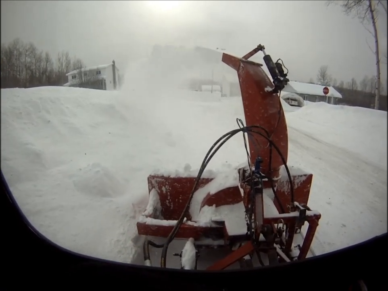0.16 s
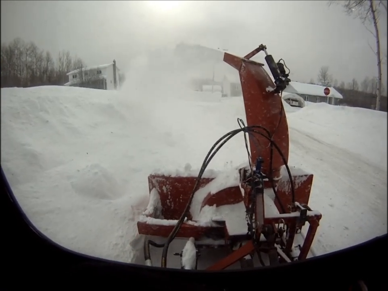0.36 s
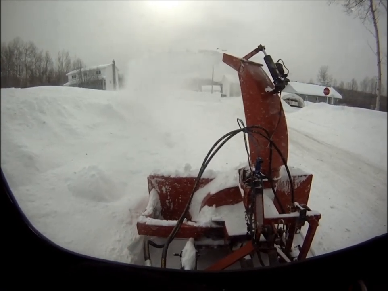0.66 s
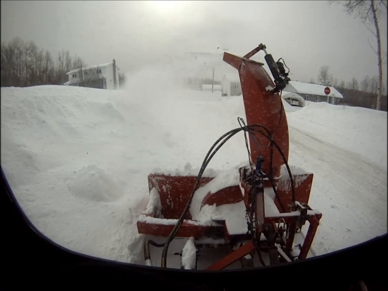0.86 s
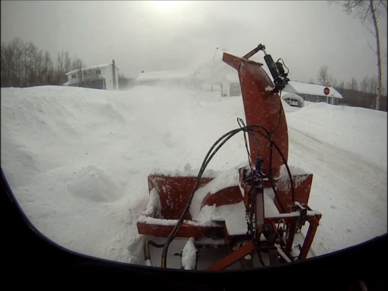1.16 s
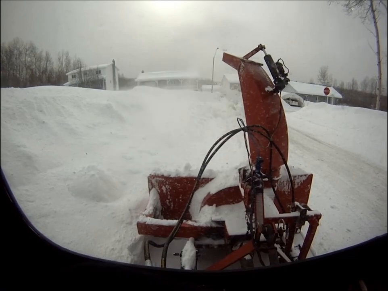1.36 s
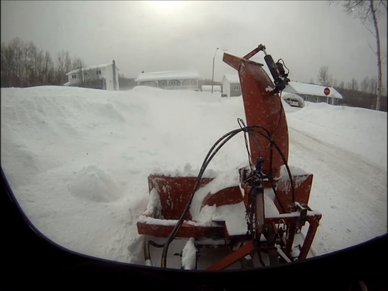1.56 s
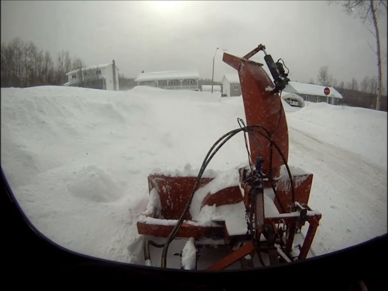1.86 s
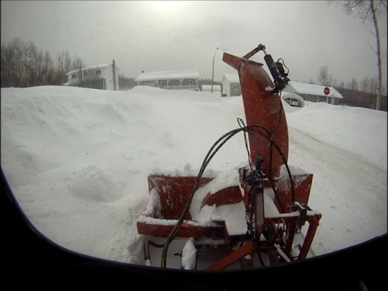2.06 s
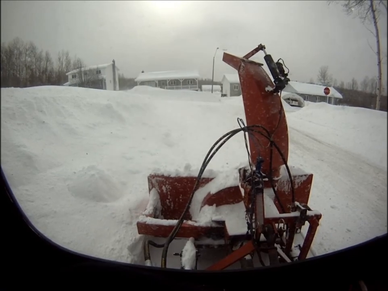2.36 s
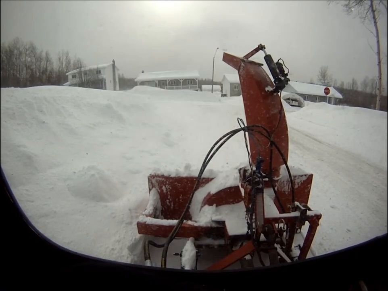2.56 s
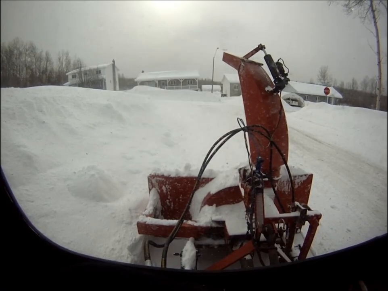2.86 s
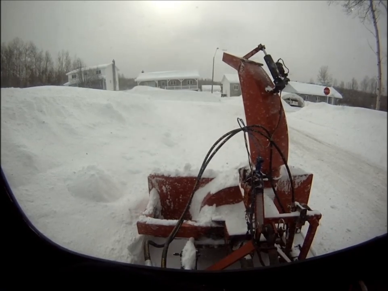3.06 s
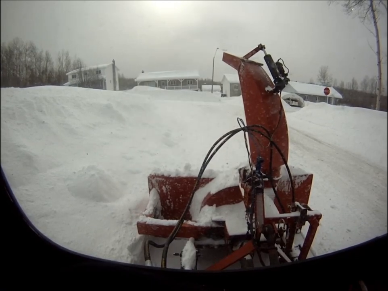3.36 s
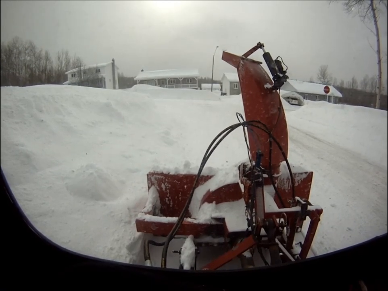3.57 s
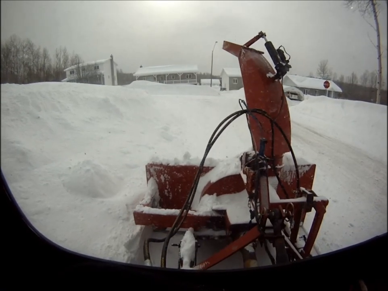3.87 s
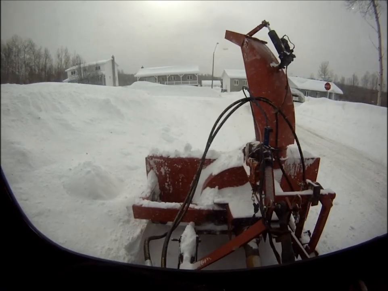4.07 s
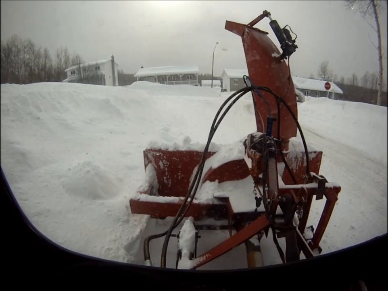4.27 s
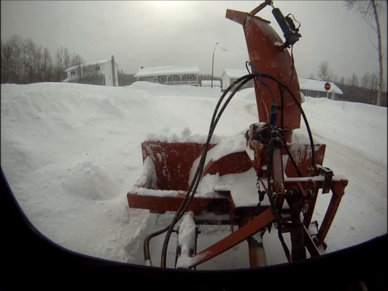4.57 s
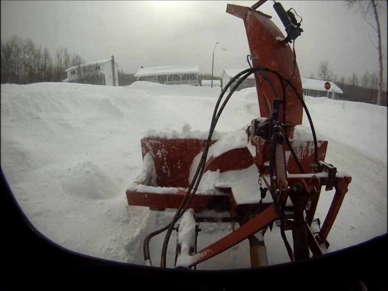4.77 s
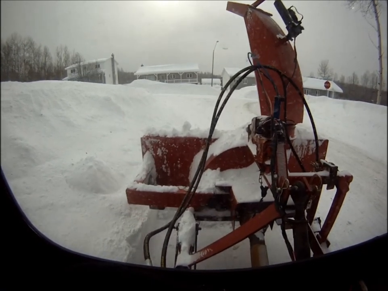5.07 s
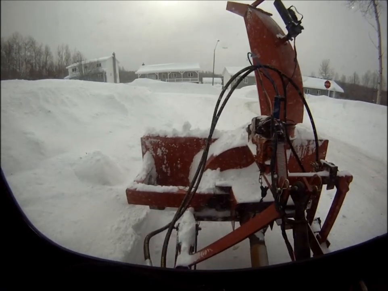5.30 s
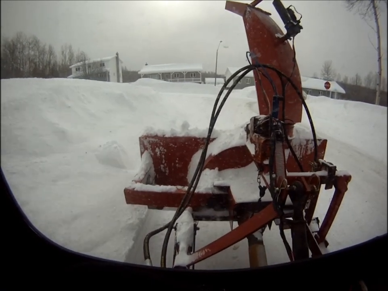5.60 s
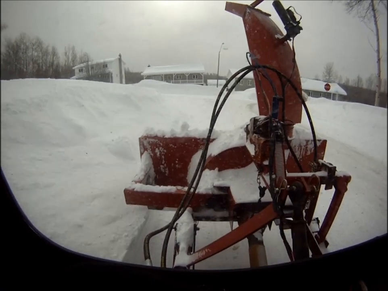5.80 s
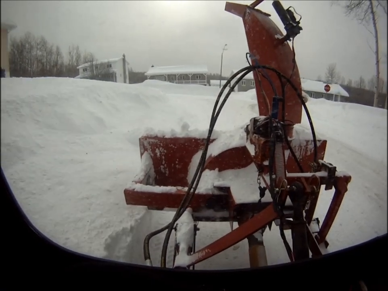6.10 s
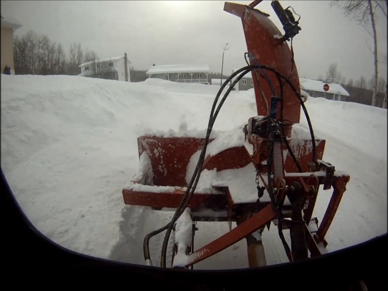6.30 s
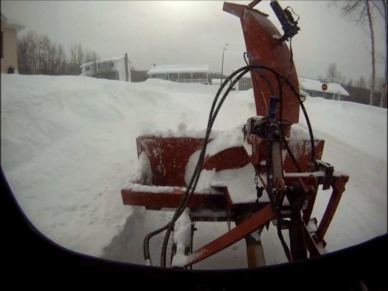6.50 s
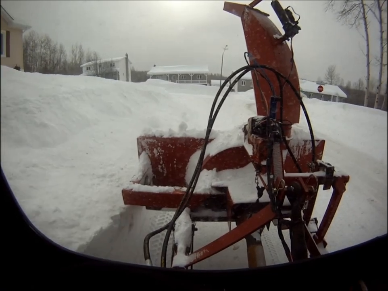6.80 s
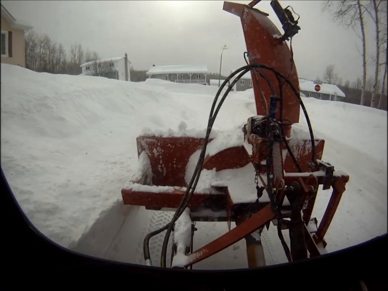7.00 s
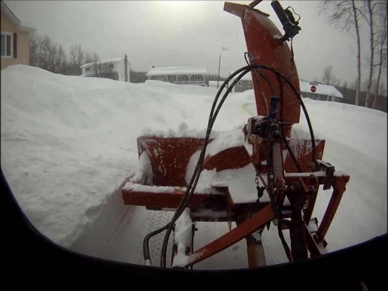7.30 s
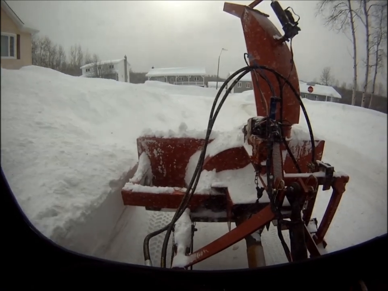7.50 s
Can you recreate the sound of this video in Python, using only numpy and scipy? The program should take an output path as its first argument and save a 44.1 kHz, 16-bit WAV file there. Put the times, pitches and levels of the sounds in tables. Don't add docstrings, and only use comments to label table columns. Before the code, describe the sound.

Inside a closed tractor cab, a small diesel drones and clatters, eases, sags as the snowblower lifts, then revs up with loud gear whine backing away.

```python
import sys
import numpy as np
from scipy import signal
from scipy.fft import rfft, irfft, next_fast_len
from scipy.io import wavfile

SR = 44100
rng = np.random.default_rng(int(sys.argv[2]) if len(sys.argv) > 2 else 0)


def generate_wav(signal):
    frames = np.transpose(np.atleast_2d(signal))
    scaled = np.clip(frames, -1, 1) * 32767
    pcm = np.round(scaled).astype(np.int16)
    wavfile.write(sys.argv[1], SR, pcm)


def rack_gain(trim_db):
    fader = np.asarray(trim_db, float)
    return 10 ** (fader / 20)


N = 337365
TIME_S = np.arange(N) / SR
END_S = N / SR
MEAN_HZ = 20.5
ENGAGE_S = 5.5

# (time [s], four-stroke cycle rate [Hz])
ENGINE_SPEED = [(0, 19.3), (.32, 19.4), (.62, 20.78), (.9, 20.87), (1.35, 20.57), (2.45, 20.92),
                (3.5, 20.86), (4.02, 19.38), (4.5, 19.88), (4.72, 19.66), (5.15, 18.22), (5.3, 18.4),
                (5.55, 19.2), (5.85, 20.6), (6.28, 21.62), (6.6, 21.56), (7.1, 21.89), (7.65, 21.9)]
# (time [s], share [0-1])
EFFORT = [(0, 0.92), (.28, 0.8), (.45, 0.66), (.8, 0.17), (2.5, 0.18), (3.8, 0.12), (4.17, .45),
          (4.8, 0.43), (5.13, 0.65), (5.41, 0.92), (5.9, 0.92), (6.7, 0.87), (7.65, 0.97)]
# (start [s], end [s], attack [s], release [s])
LABOUR = (4.86, 5.72, .25, 0.075)
LABOUR_DB = [-2, -2, 7, -3]
# (frequency [Hz], level [dB])
FIRING = [(55, -17), (59, -17), (62, -16), (66, -16.4)]
CRANK = [(37, -23), (41.7, -26), (42.3, -25.5), (44, -31)]
THIRD = [(165, -26.5), (175, -26.5), (178.5, -28), (187, -27.5), (197, -30.5)]
FOURTH = [(220, -26.5), (236, -32.5), (249, -32.5), (263, -27)]
# (multiple of the cycle rate [-], level [dB])
MINOR_ORDERS = [(4, -34), (5, -52), (6, -47), (7, -47), (8, -39), (10, -27.5), (11, -44), (13, -43),
                (14, -42), (15, -41), (16, -44), (17, -46), (18, -46), (19, -50), (20, -51), (21, -46),
                (24, -53), (32, -49), (33, -41), (34, -45), (37, -52)]
# (frequency [Hz], level [dB])
CAB_BOOM = [(76, -6), (84, .1), (98, 14), (104, .1), (113, 8), (124, .1), (152, -6), (160, 6), (167, 8),
            (174, -1), (186, -10), (196, .1), (310, .1), (330, 3), (400, .1), (436, 3), (458, 10),
            (500, -2), (760, .1)]
# (place in the cycle [0-1], knock level [dB])
CYLINDERS = [
    (.1, -30),
    (.45, -5),
    (.78, -10),
]
# (frequency [Hz], level [dB per Hz])
RUMBLE = [(25, -26), (45, -28), (70, -4), (110, -18.5), (150, -11), (200, -5.5), (260, -9), (350, -15),
          (520, -19.5), (600, -13), (690, -15), (800, -19), (900, -25), (1200, -44), (1600, -79)]
# (frequency [Hz], level [dB per Hz])
CLATTER = [(530, -17), (900, -10), (924, -9), (1060, -3), (1180, -10), (1280, -2.5), (1990, -2.5),
           (2160, -1.5), (2340, -1.5), (2530, 1.5), (2820, -2), (3610, -0.5), (4580, -9.5), (5970, -18.5),
           (7450, -37), (9680, -61), (16400, -120)]
# (frequency [Hz], level [dB], t60 [s])
TAP_MODES = [(1425, -40.5, 0.057), (714, -36.5, 0.051), (1250, -44.5, 0.048), (2138, -40, 0.029),
             (2953, -42.5, 0.043), (3650, -44, 0.022)]
# (multiple of the cycle rate [-], level [dB], fully loaded from [s])
DRIVE = [(32.06, -24.5, 5.76), (39.6, -30.5, 4.9), (51.9, -50, 6.2), (59.8, -43, 4.8), (64.3, -31, 6.25),
         (69.05, -33.5, 5.7), (85.95, -41.5, 5.88), (119.9, -48, 5.6)]
# (multiple of the cycle rate [-], level [dB])
LIFT_PUMP = [(41.65, -49), (125.2, -58), (50.6, -58)]
# (start [s], end [s], attack [s], release [s])
LIFT_ON = (.4, 3.76, .08, 0.11)
# (time [s], level [dB])
LIFT_SURGES = [
    (.44, -1),
    (3.55, 9),
]
# (time [s], peak level [dB], decay [s])
LUMP = [
    (1.88, -35, 0.016),
    (1.904, -19, .006),
    (1.909, -17, 0.004),
    (1.9125, -14, .003),
    (1.9175, -20, 0.003),
    (1.922, -24, 0.008),
]
# (frequency [Hz], level [dB per Hz])
LUMP_COLOUR = [(530, -22), (900, -7), (1140, -26), (1450, -9), (1790, -14), (2700, -6), (3940, -5),
               (4660, -16), (6640, -13.5), (7450, -47), (9680, -59), (16400, -120)]
# (start [s], end [s], start pitch [Hz], end pitch [Hz], level [dB])
WHISTLES = [(0, .32, 596, 610, -35), (0, 0.318, 1077, 1082, -44), (0, .3, 1160, 1157, -47),
            (0, 0.327, 1615, 1620, -38.5), (0, .32, 2148, 2148, -50), (.1, .3, 2700, 2715, -41),
            (0.428, 0.593, 723, 750, -35.5), (.45, 0.638, 1000, 1040, -47),
            (0.421, 0.554, 2500, 2570, -44.5), (3.88, 4.02, 2850, 2860, -47),
            (3.721, 4.791, 1252, 1250, -51), (5.517, 5.78, 2502, 2560, -46),
            (5.543, 5.679, 3010, 3150, -48), (5.563, 5.659, 1820, 1950, -50)]
# (start [s], end [s], attack [s], release [s])
RAISING = (3.45, 5.3, 0.1, 0.91)
# (time [s], level [dB])
JOLTS = [
    (.3, 19),
    (3.5, 6),
    (4.78, 6),
]


def rms_one(x):
    return x / np.sqrt(np.mean(x ** 2) + 1e-20)


def in_time(rows):
    times, values = np.transpose(rows)
    return np.interp(TIME_S, times, values)


def at_hz(points, hz):
    points_hz, level_db = np.transpose(points)
    return np.interp(np.log(hz + 1), np.log(points_hz), level_db)


def noise():
    return rng.standard_normal(N)


def colour(x, spectrum):
    size = next_fast_len(N)
    hz = np.arange(size // 2 + 1) * SR / size
    return rms_one(irfft(rfft(x, size) * rack_gain(at_hz(spectrum, hz)), size)[:N])


def drift(rate):
    r = np.exp(-80 * np.pi * rate / SR)
    draws = rng.standard_normal(N // 40 + 2002)
    slow = signal.lfilter([1], [1, -2 * r, r * r], draws)[2000:]
    return np.interp(np.arange(N) / 40, np.arange(len(slow)), rms_one(slow))


def tone(cycles, wobble, flutter_db, rate):
    level = rack_gain(flutter_db * drift(rate))
    return np.sqrt(2) * level * np.cos(2 * np.pi * cycles + wobble * drift(rate))


def gate(start, end, attack, release):
    return np.clip(np.minimum((TIME_S - start) / attack, 1 - (TIME_S - end) / release), 0, 1)


def surges(rows, settle):
    total_db = np.zeros(N)
    for at, db in rows:
        fall = np.exp(-np.maximum(TIME_S - at - settle / 3, 0) / settle)
        total_db += db * gate(at, END_S, settle / 3, 1) * fall
    return total_db


def engine_tones(cycles, speed_hz, labour):
    crank_lead = .11
    bend = .165
    orders = []
    for order, carry, labour_db in zip([3, 2, 9, 12], [FIRING, CRANK, THIRD, FOURTH], LABOUR_DB):
        orders.append((order, at_hz(carry, order * speed_hz - 1) + labour_db * labour))
    for order, db in MINOR_ORDERS:
        order = round(order)
        orders.append((order, db + at_hz(CAB_BOOM, order * speed_hz)))
    out = np.zeros(N)
    for order, level_db in orders:
        loose = order / 12
        scatter = rng.random() * (order > 12)
        phase = scatter + order * (cycles + crank_lead) + bend * order ** 2
        level_db = level_db + 1.2 * (order == 9)
        out -= rack_gain(level_db) * tone(phase, wobble=.12 * loose, flutter_db=.8 * loose, rate=5)
    return out


def looped_noise(cycles, repeat):
    loop = rng.standard_normal(2100)
    same = loop[(cycles % 1 * len(loop)).astype(int)]
    return np.sqrt(repeat) * same + np.sqrt(1 - repeat) * noise()


def knocks(cycles, depth, fade):
    blows = sum(rack_gain(db) * np.exp(-((cycles - at) % 1) / fade) for at, db in CYLINDERS)
    return 1 + depth * blows


def grit(spread_db):
    return rack_gain(spread_db * rms_one(signal.lfilter([1], [1, -.985], noise())))


def rumble(cycles, effort):
    pulses = looped_noise(cycles, repeat=0.62) * knocks(cycles, depth=0.42, fade=0.068)
    return rack_gain(-28.5 + 5.5 * effort) * colour(pulses, RUMBLE)


def clatter(cycles, effort, labour):
    bite_db, bite_s = 4.5, 0.075
    contacts = looped_noise(cycles, repeat=0.67) * knocks(cycles, depth=0.52, fade=0.13) * grit(1.54)
    level_db = -37 + 5 * effort - 2 * labour + surges([(ENGAGE_S + bite_s, bite_db)], bite_s)
    return rack_gain(level_db) * colour(contacts, CLATTER)


def tap(cycles, speed_hz):
    seats_hz = 20.8
    strength_db = 0.9 - (speed_hz - MEAN_HZ) - 16 * np.maximum(speed_hz - seats_hz, 0)
    at = np.flatnonzero(np.diff(np.floor(cycles - .7)) > 0)
    out = np.zeros(N)
    for hz, level_db, t60 in TAP_MODES:
        clicks = np.full(N, 1e-18)
        clicks[at] = rack_gain(level_db + strength_db[at] + 3.25 * rng.standard_normal(len(at)))
        r, w = rack_gain(-60 / (t60 * SR)), 2 * np.pi * hz / SR
        pole = [1, -2 * r * np.cos(w), r * r]
        swell = signal.lfilter([1, -r * np.cos(w)], [1], clicks)
        swell = signal.lfilter([(1 - r) * np.e], pole, swell)
        out += 2 * signal.lfilter([0, np.sin(w)], pole, swell)
    return out


def drive_whines(speed_hz):
    attack_s = 0.063
    slip, slip_ends_s, slip_s = .04, 5.74, .17
    idle_db = -20 * (1 - gate(ENGAGE_S, END_S, attack_s, 1)) ** 2
    gear_db = idle_db - 3.2 + surges([(ENGAGE_S + attack_s, 6)], settle=.14)
    piston_db = idle_db + 0.8 + surges([(ENGAGE_S, 8.5)], settle=0.62)
    driven = np.cumsum(speed_hz * (1 - slip * gate(-1, slip_ends_s - slip_s, 1, slip_s))) / SR
    out = np.zeros(N)
    for multiple, level_db, loaded_s in DRIVE:
        unloaded_db = 14 * np.clip((loaded_s - TIME_S) / .14, 0, 1)
        piston_order = multiple / 17.19
        is_piston = abs(piston_order - round(piston_order)) < .05
        level_db = level_db - unloaded_db + (piston_db if is_piston else gear_db)
        out += rack_gain(level_db) * tone(multiple * driven, wobble=0.43, flutter_db=2.5, rate=20.5)
    return out


def lift_pump(cycles):
    load_db = 3 - 21 * (1 - gate(*LIFT_ON)) + surges(LIFT_SURGES, settle=0.26)
    out = np.zeros(N)
    for multiple, level_db in LIFT_PUMP:
        out += rack_gain(level_db + load_db) * tone(multiple * cycles, wobble=0.92, flutter_db=4.0, rate=2.4)
    return out


def rush(effort, labour):
    pipes = [(1000, -10.5), (1250, -6.0), (1420, 7.0), (1550, -1.5), (1900, -29), (2400, -57)]
    return rack_gain(-61.5 + 27.5 * effort + 4 * labour) * colour(noise(), pipes)


def lump():
    attack_s = .0012
    bounces = np.zeros(N)
    for at, db, decay in LUMP:
        rise = np.clip((TIME_S - at) / attack_s, 0, 1)
        bounces += rack_gain(db) * rise * np.exp(-np.maximum(TIME_S - at, 0) / decay)
    return bounces * colour(noise(), LUMP_COLOUR)


def frame(speed_hz, labour):
    centre_hz = 672 + 9 * (speed_hz - MEAN_HZ) + 12 * drift(1.5)
    level_db = -39.5 + 7 * labour + 1.2 * drift(1.8)
    angle = 2 * np.pi * np.cumsum(centre_hz) / SR
    return rack_gain(level_db) * (drift(19) * np.cos(angle) + drift(29) * np.sin(angle))


def whistles():
    out = np.zeros(N)
    for start, end, from_hz, to_hz, db in WHISTLES:
        on = np.clip(np.minimum(TIME_S - start + 0.035, end - TIME_S) / 0.033, 0, 1)
        cycles = np.cumsum(np.interp(TIME_S, [start, end], [from_hz, to_hz])) / SR
        out += rack_gain(db) * on * tone(cycles, wobble=0.61, flutter_db=5, rate=45.0)
    return out


def chain(level_db):
    clinks = rng.random(N) < 160 / SR
    strength = rack_gain(3.4 * np.minimum(rng.exponential(1, N), 4))
    links = clinks * strength * rng.choice([-1, 1], N)
    mode = signal.butter(2, [3560, 3800], "band", fs=SR, output="sos")
    return rack_gain(level_db) * rms_one(signal.sosfilt(mode, links + 1e-18))


def cab_shake():
    level_db = -39 + 6 * gate(*RAISING) + surges(JOLTS, settle=0.12)
    panels = [(25, -27), (45, -5), (70, 0.0), (110, -6), (145, -5.5), (200, -4), (320, -19), (500, -52.5)]
    return rack_gain(level_db) * colour(noise(), panels)


def snow(labour):
    hiss = [(3500, -40), (5000, -9.0), (6000, 3.0), (6800, -5.0), (7450, -13)]
    return rack_gain(-52.5 - 3 * labour) * colour(noise() * grit(1.7), hiss)


def scene():
    speed_hz = in_time(ENGINE_SPEED)
    cycles = np.cumsum(speed_hz) / SR
    effort = np.clip(in_time(EFFORT), 0, 1.2)
    labour = gate(*LABOUR)
    cab = rumble(cycles, effort) + clatter(cycles, effort, labour)
    cab += engine_tones(cycles, speed_hz, labour) + tap(cycles, speed_hz)
    cab += drive_whines(speed_hz) + lift_pump(cycles)
    cab += lump() + whistles() + frame(speed_hz, labour)
    cab += chain(level_db=-46 + 1.5 * drift(4.5)) + snow(labour) + cab_shake()
    cab += rush(effort, labour)
    return np.array([cab, cab])


def band_limit(x):
    return signal.sosfilt(signal.butter(12, 15950, fs=SR, output="sos"), x)


def record(dry):
    hold_hz = 15000
    ceiling = 1.1
    size = next_fast_len(N)
    hz = np.arange(size // 2 + 1) * SR / size
    rounded = ceiling * np.tanh(dry[0] / ceiling)
    lowpass = (hz < hold_hz / 2) / np.sinc(np.minimum(hz / hold_hz, .5))
    base = irfft(rfft(rounded, size) * lowpass, size)
    imaged = base * (1 + 2 * np.cos(2 * np.pi * hold_hz * np.arange(size) / SR))
    held = irfft(rfft(imaged) * np.sinc(hz / hold_hz) * (hz < 15760), size)[:N]
    thin = signal.sosfilt(signal.butter(1, [400, 18000], "band", fs=SR, output="sos"), held)
    side = rack_gain(-44 + 14.0 * drift(20.6)) * drift(116) * thin
    return band_limit(np.array([held + side, held - side]))


dry = scene()
out = record(dry)
generate_wav(out)
```